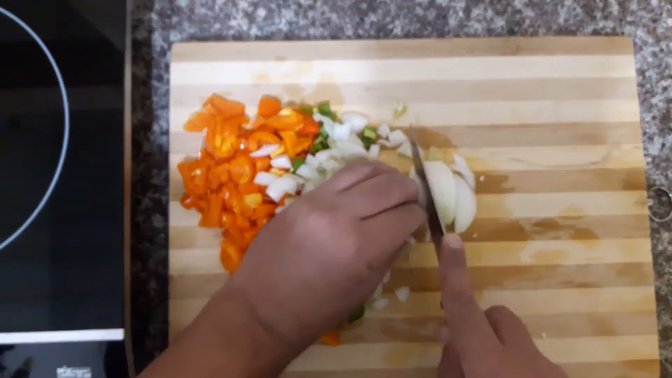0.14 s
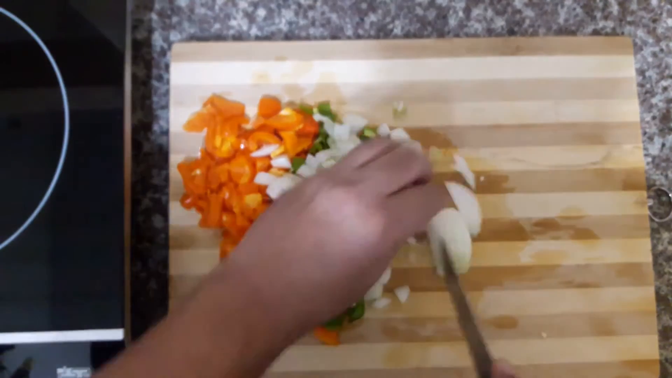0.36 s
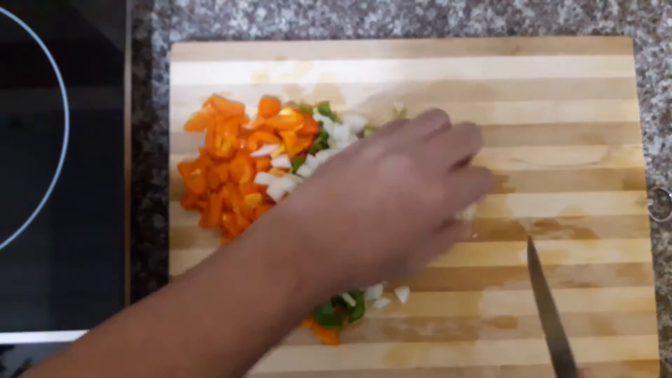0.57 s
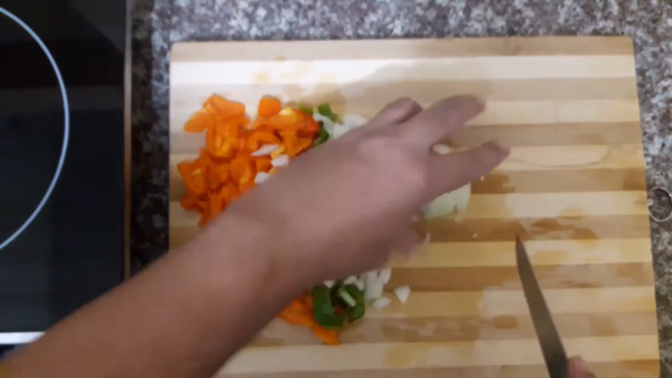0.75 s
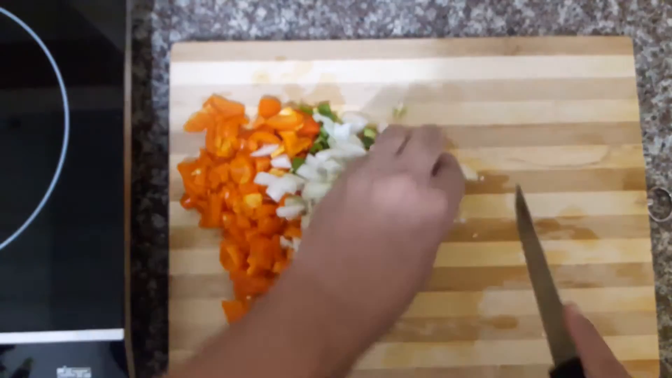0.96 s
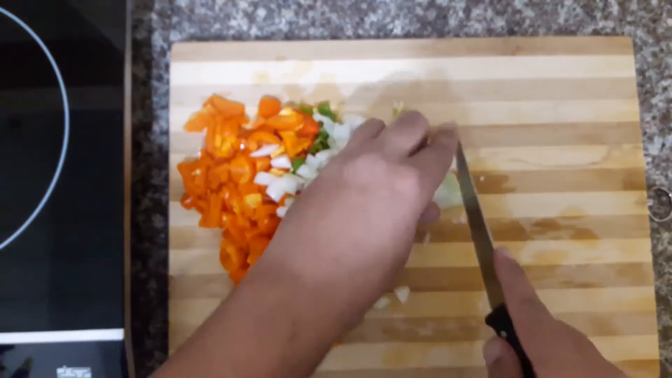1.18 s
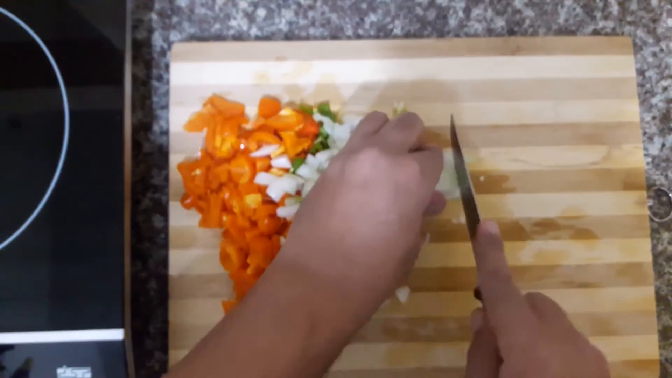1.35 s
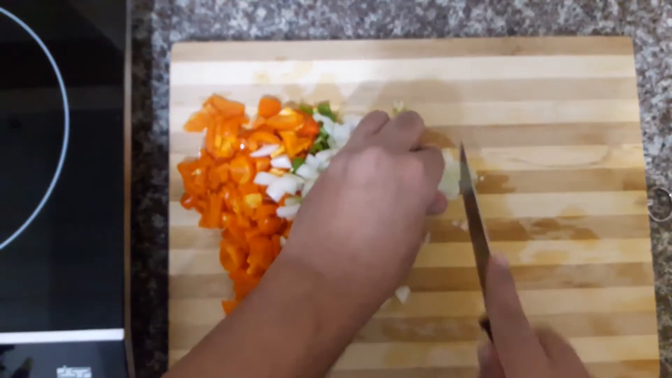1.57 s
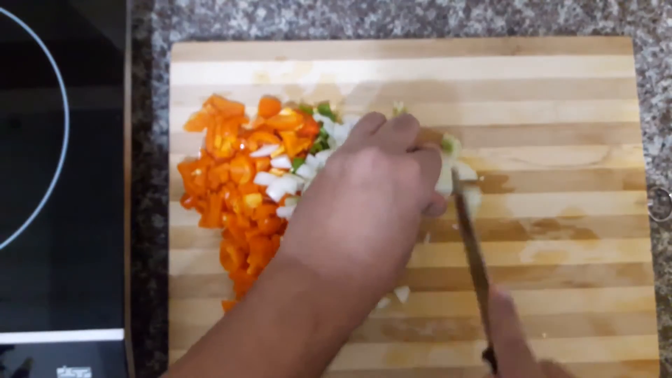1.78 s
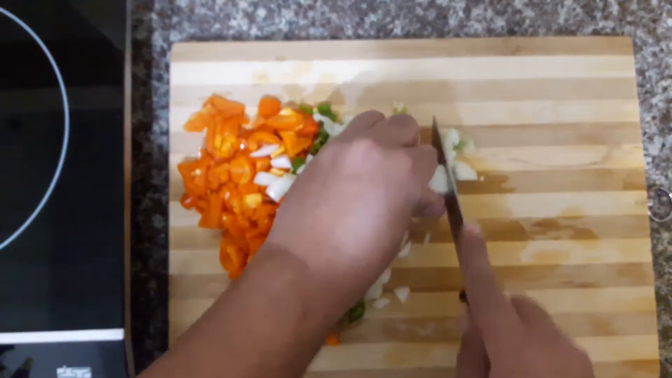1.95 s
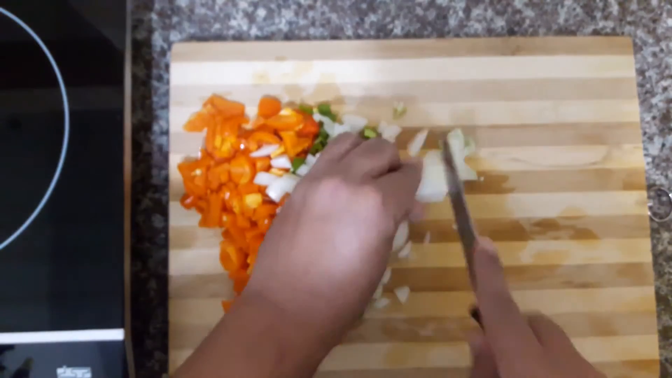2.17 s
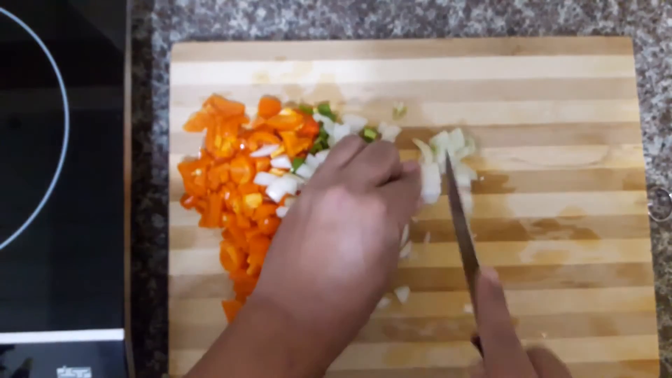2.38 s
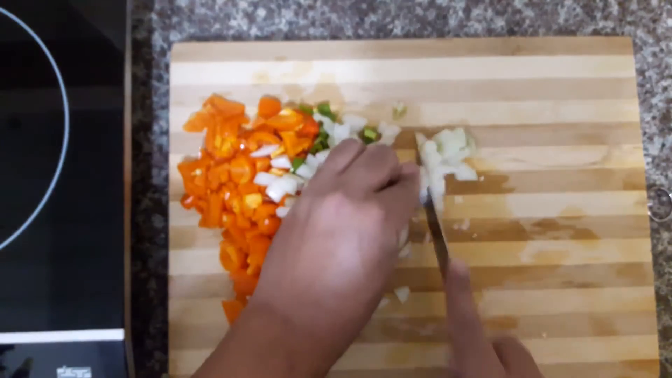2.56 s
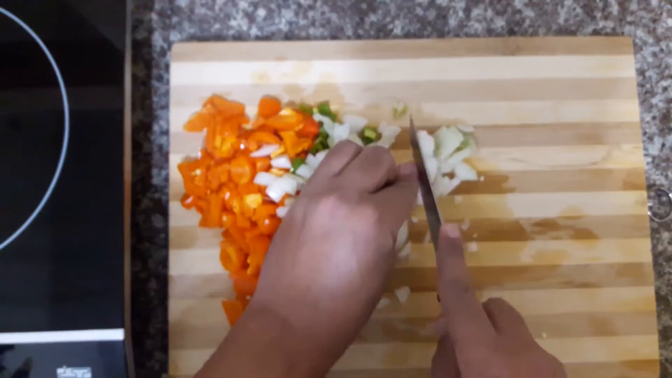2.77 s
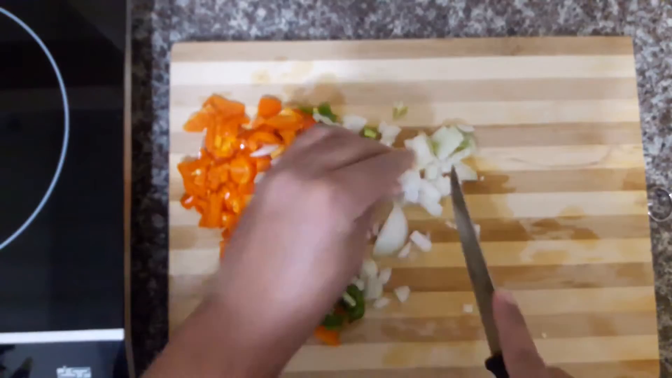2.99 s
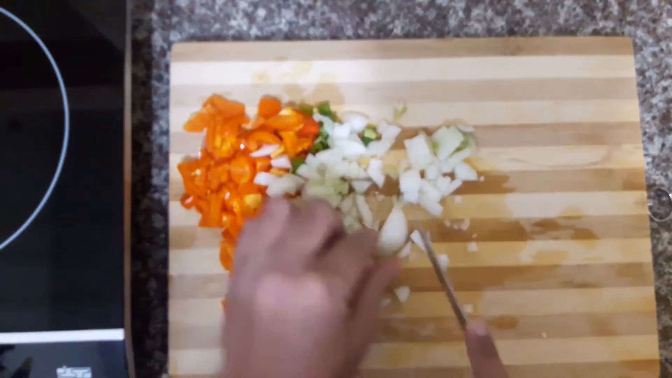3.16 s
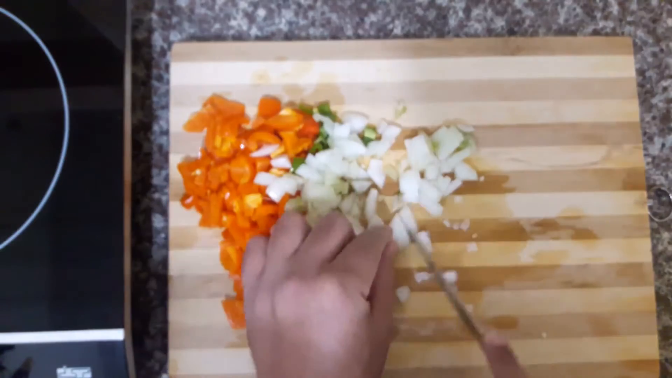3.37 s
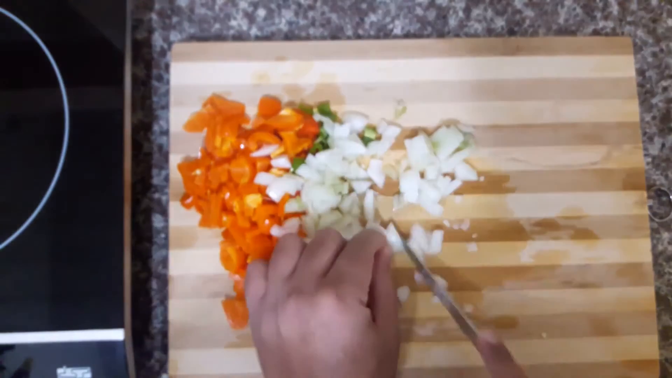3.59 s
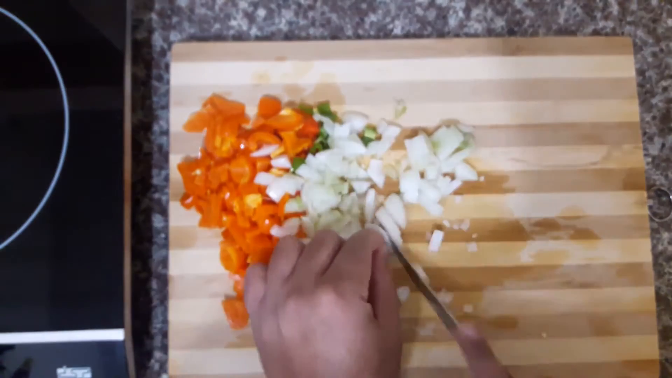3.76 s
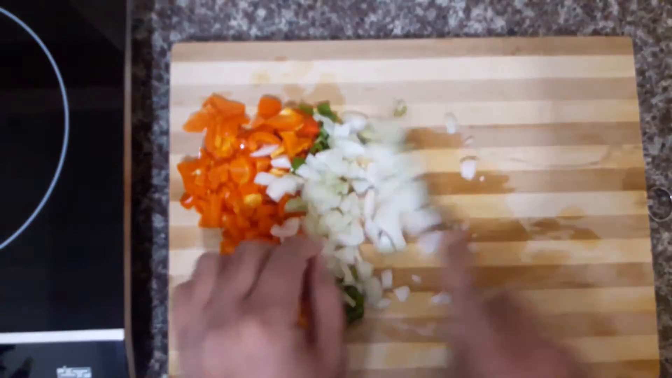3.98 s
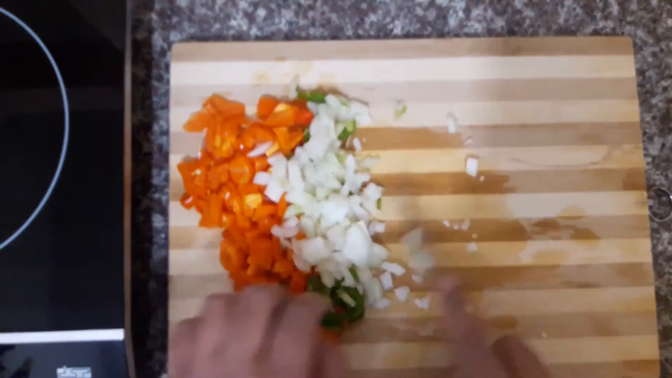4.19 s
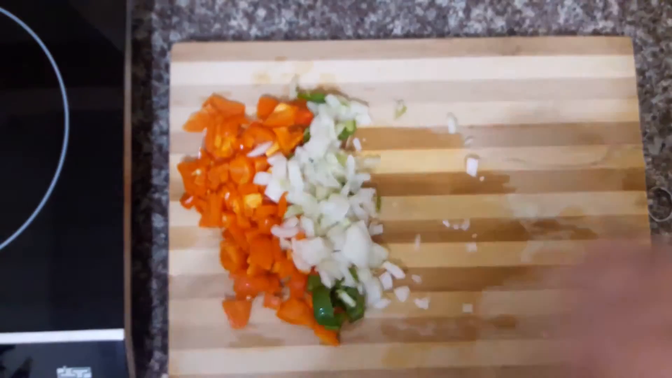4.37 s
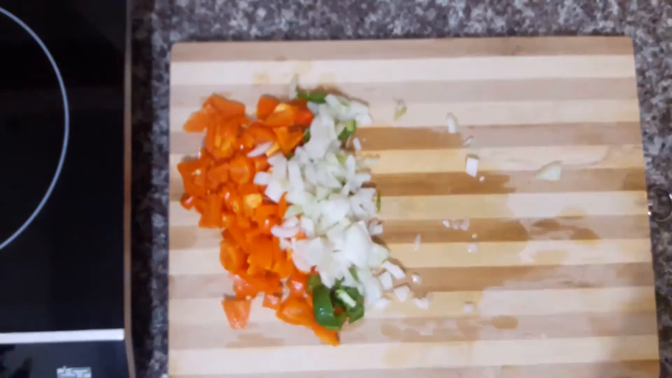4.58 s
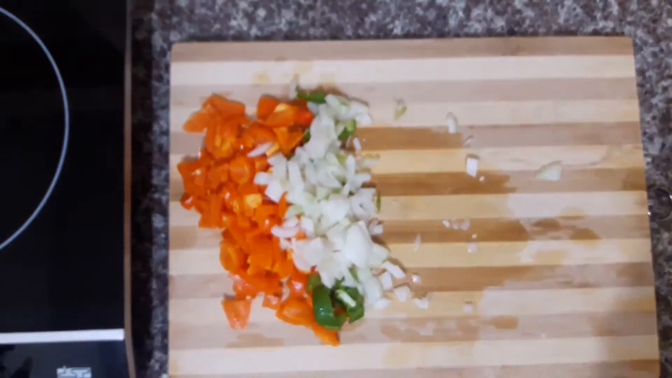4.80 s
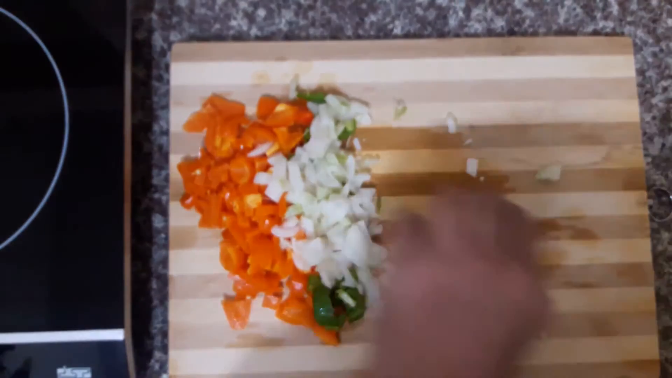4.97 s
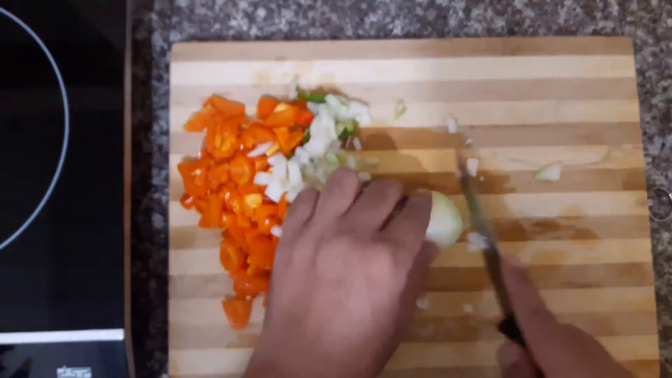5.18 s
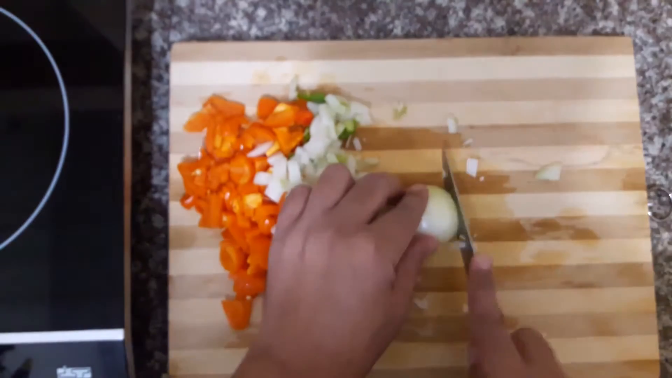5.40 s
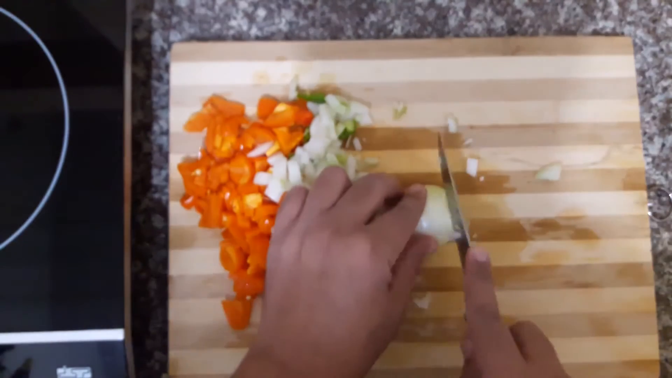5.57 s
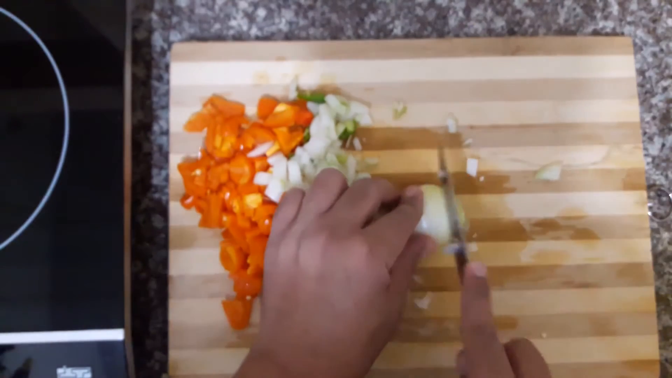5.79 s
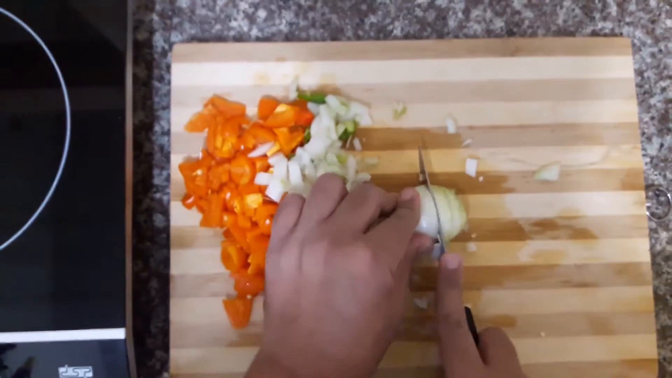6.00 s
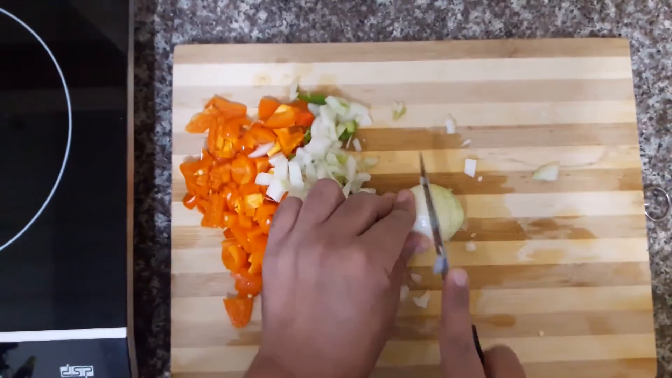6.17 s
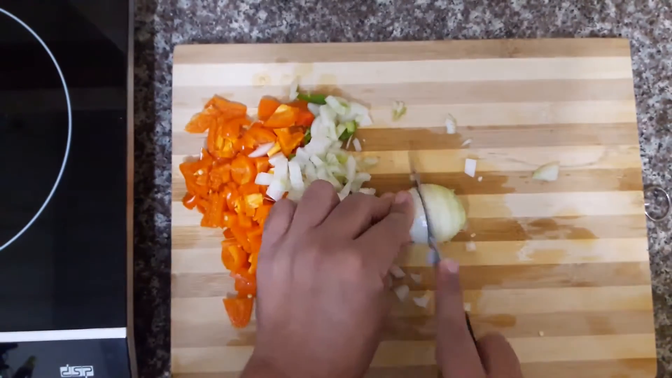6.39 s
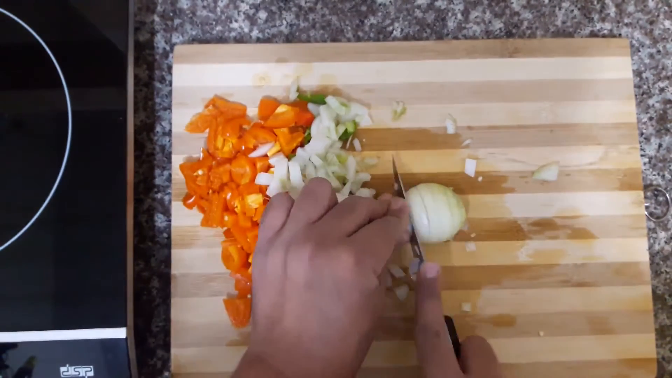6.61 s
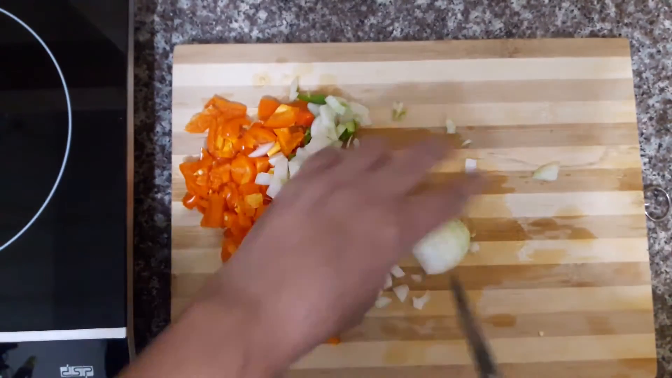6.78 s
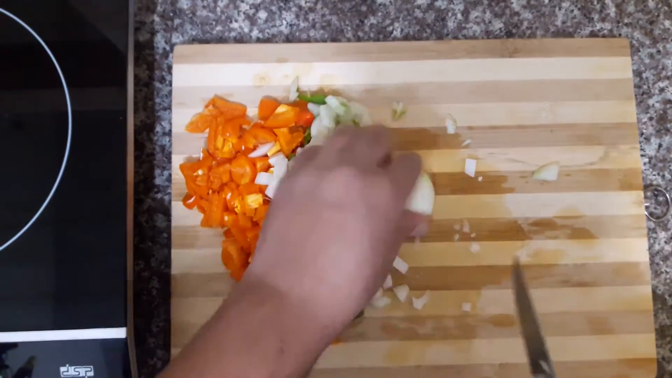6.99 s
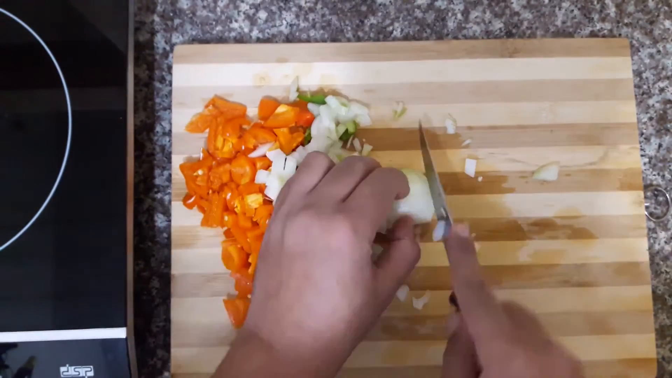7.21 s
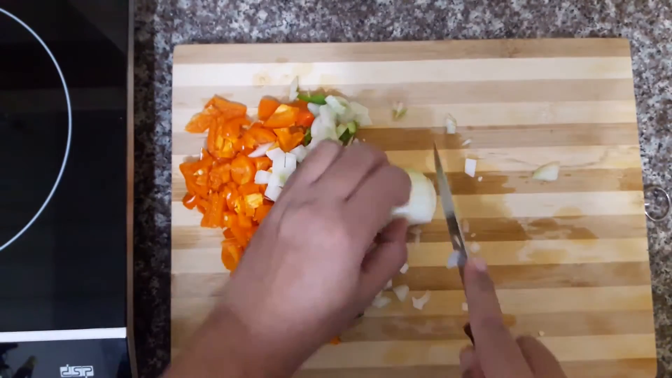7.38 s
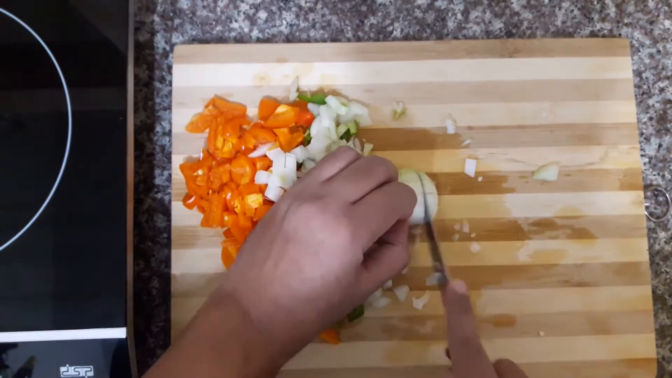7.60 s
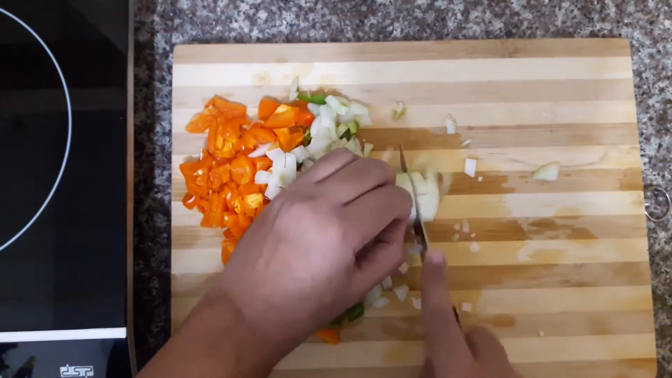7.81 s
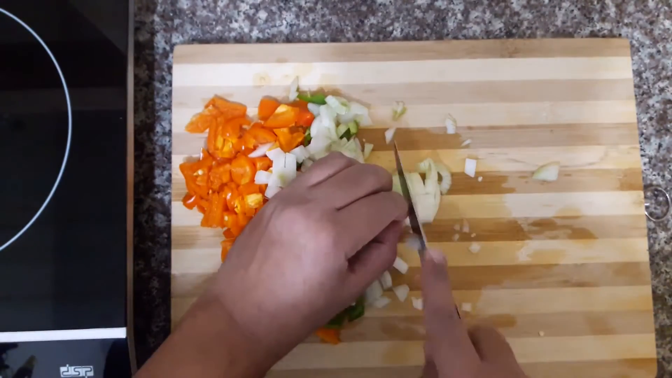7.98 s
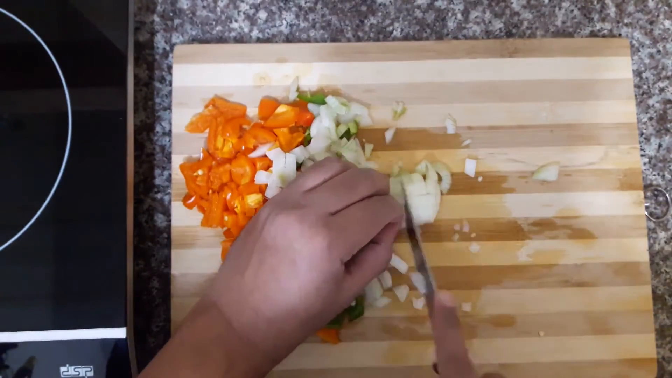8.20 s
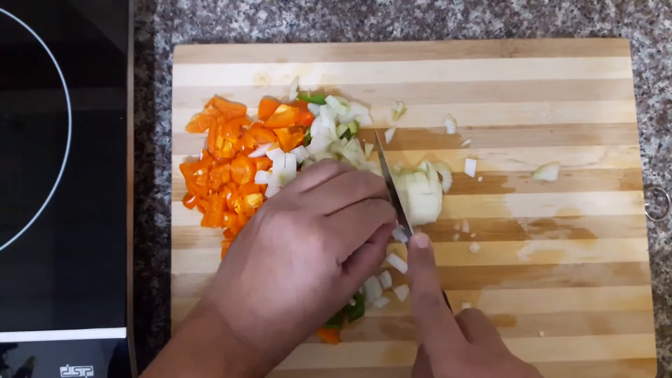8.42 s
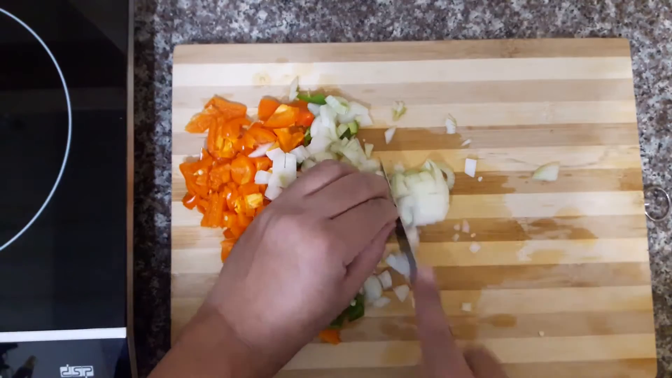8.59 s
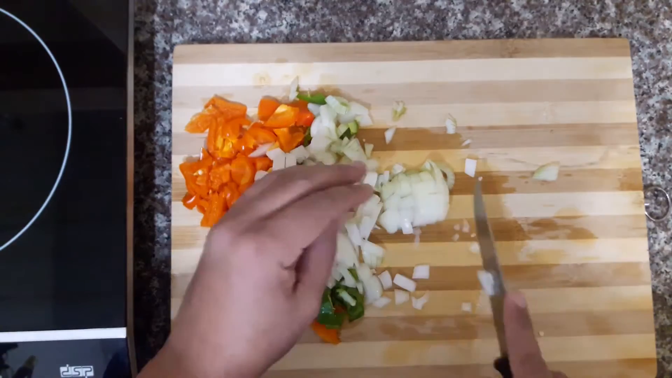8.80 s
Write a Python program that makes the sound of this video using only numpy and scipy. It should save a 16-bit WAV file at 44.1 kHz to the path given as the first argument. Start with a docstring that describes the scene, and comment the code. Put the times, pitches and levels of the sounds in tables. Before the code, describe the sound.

Quiet room air and the faint ring of an earlier chop open the scene, heard close in a small reflective kitchen. A hand rustles, onion crunches and the knife knocks the wooden board at 0.24 s. Soft handling fills the gap until 1.4 s, then crisp cuts land at about 1.5, 1.7, 2.0, 2.3 and 2.9 s, each a crackling wet crunch followed by a hard knock, faint blade ring and low board thud. Three sharper chops come at 3.4, 3.6 and 3.8 s. From 4.0 s pieces are swept aside with rustling, a knock at 4.26 s and tiny wet squeaks near 4.65-4.75 s. Chopping resumes at 5.4, 5.7, 6.1, 6.35 and 6.6 s. After a short, lightly rustling gap, strong regular strokes fall at 7.3, 7.6, 7.9, 8.15 and 8.5 s, the last echo fading into quiet air.

```python
"""First come steady room air and the faint ring of an earlier chop; then a hand rustles and a knife chops onion.
The onion crunches as swarms of snaps, and short impulses excite the wood, the blade edge and a fine fizz.
Low damped modes make the board thud on the counter; wet squeaks are gliding stick-slip tones.
Decaying echoes and lasting tones form the small tiled kitchen, heard close under a phone microphone."""
import sys
import numpy as np
from scipy import signal
from scipy.fft import rfft, irfft, next_fast_len
from scipy.io import wavfile
from scipy.ndimage import uniform_filter1d

SR = 44100
rng = np.random.default_rng(int(sys.argv[2]) if len(sys.argv) > 2 else 0)


def unload_wav(signal):
    """Save mono or channel-first audio to the path in sys.argv[1] as 16-bit WAV at rate SR, clipped to [-1, 1]."""
    wavfile.write(
        sys.argv[1],
        SR,
        np.round(np.clip(np.atleast_2d(signal).T, -1, 1) * 32767).astype(np.int16),
    )


N = 390285  # length [samples]

# room air and hiss: (frequency [Hz], relative density [dB per Hz])
AIR_COLOUR = [(24, -30.5), (40, -2.5), (49, -12.5), (64, -12.5), (220, -1.5), (433, -2), (529, -0.5),
              (1480, -10), (1760, -11), (7000, -24), (13800, -28.5), (16000, -54)]
AIR_DB = -69  # middle level of the slow swell
WIDE_DB = -9.5  # side air relative to the air common to both channels

# band decay of the kitchen: (frequency [Hz], decay by 60 dB [s])
KITCHEN_T60 = [(100, 0.21), (260, 0.91), (700, 0.28), (1840, 0.38), (4850, 0.33), (12800, 0.25)]
# colour of the kitchen: (frequency [Hz], gain [dB])
KITCHEN_COLOUR = [(200, -7), (450, 2.5), (700, 13), (1200, 3.5), (2000, -4.5), (3000, 2.5), (4500, 2.5),
                  (7000, 7), (10000, 7.5), (15000, 6)]
# lasting tones of cupboards and counter: (frequency [Hz], relative level [dB])
LASTING_TONES = [(589, 7.5), (715, -4.5), (951, -11.5), (1216, -15), (1309, -6.5), (1553, -22.5),
                 (1743, 6.5), (1783, -4.5), (1955, 1), (2112, 9), (2300, 7), (4041, -13)]
TONES_T60 = 0.28  # s
PATCHY_DB = 2.5  # rms unevenness: walls and shelves make echoes lumpy in time and pitch
EARLIER_DB = -32  # wood force of a chop just before the start, heard only through the room

# hand and blade among the pieces:
# (loudest time [s], level [dB], treble lift [dB], rise [s], fall [s])
RUSTLES = [(.135, -57.5, 2, 0.072, .02), (.65, -72, 3.5, .1, 0.076), (.87, -64, -18, .05, 0.54),
           (.99, -63.5, 4, 0.17, .12), (1.13, -75, -5, 0.0091, .03), (1.25, -66, -20.5, .2, .2),
           (1.395, -58.5, -6, 0.12, .02), (3.227, -66, 3, 0.011, 0.036), (3.301, -61, -3, 0.086, 0.021),
           (4.008, -45, 0, 0.0034, 0.12), (4.2, -68, -4, 0.065, .05), (4.33, -50, -6.5, 0.047, 0.37),
           (4.63, -62.5, 10.5, 0.018, .06), (4.685, -56, -9, 0.013, 0.11), (4.96, -59.5, -1, 0.22, .25),
           (5.335, -69.5, 4.5, .008, 0.017), (6.919, -62, -3.5, 0.068, .08),
           (6.995, -67.5, 2.5, 0.018, 0.076), (7.25, -69.5, -2, 0.011, 0.031)]
# rustling grains: (frequency [Hz], relative density [dB per Hz])
RUSTLE_COLOUR = [(88, -42), (150, -18.5), (249, -15), (275, -17.5), (514, -5), (601, -9), (730, -2.5),
                 (805, -10.5), (1400, -13.5), (2050, -9), (2800, -12.5), (7620, -28), (14200, -30.5),
                 (16000, -34)]
RUSTLE_SPAN_DB = 20  # change of level over one rise or fall
TREBLE_HZ = 1600  # where the lifted treble begins

# blade splits onion, pieces shift: (time [s], level [dB], crispness [dB], length [s])
CRUNCHES = [(0.087, -42.5, 1, 0.006), (0.134, -36.5, -12.5, 0.0088), (0.142, -24.5, -0.5, 0.015),
            (0.173, -20.5, 1, 0.011), (0.235, -16, 1.5, 0.0031), (1.126, -44.5, -31, 0.0055),
            (1.331, -54, 9, 0.005), (1.383, -46.5, 4.5, 0.01), (1.399, -34.5, 0, 0.012),
            (1.444, -18.5, -4, 0.0039), (1.453, -17, 2.5, 0.0035), (1.459, -10, 2.5, 0.0035),
            (1.466, -14, -2, 0.0074), (1.674, -27, 2, 0.033), (1.725, -18.5, 4.5, 0.0094),
            (1.937, -29, -2.5, 0.019), (1.951, -32.5, 3, 0.0054), (1.962, -24, 0.5, 0.0035),
            (1.968, -34, -4, 0.0041), (2.005, -16.5, 5.5, 0.0066), (2.228, -34, 1.5, 0.027),
            (2.267, -32.5, 3.5, 0.0035), (2.301, -24.5, -1, 0.0046), (2.306, -8.5, -0.5, 0.0096),
            (2.502, -26.5, -0.5, 0.038), (2.537, -22, 1, 0.012), (2.569, -14.5, 2, 0.007),
            (2.587, -21.5, -2.5, 0.0054), (2.783, -26.5, -1, 0.038), (2.847, -11, 2.5, 0.033),
            (3.304, -37, -7.5, 0.01), (3.343, -18, -1.5, 0.013), (3.358, -25, 3, 0.004),
            (3.549, -15.5, -2, 0.005), (3.565, -18.5, 0, 0.003), (3.735, -30, -1, 0.008),
            (3.746, -19, 1, 0.01), (3.772, -14.5, -39.5, 0.0011), (4.002, -26, 0.5, 0.025),
            (4.397, -35.5, -2.5, 0.0082), (4.619, -52, 3.5, 0.0049), (4.643, -40.5, -4, 0.01),
            (4.693, -27, -22, 0.0044), (4.742, -40.5, -8, 0.005), (5.082, -56, 0, 0.0054),
            (5.382, -28, 0.5, 0.0058), (5.421, -22, 2.5, 0.0024), (5.62, -38, 5.5, 0.0057),
            (5.636, -16, -2, 0.0051), (5.695, -5, -0.5, 0.024), (5.884, -26, 0.5, 0.0045),
            (5.908, -17.5, 4, 0.0017), (5.917, -18, -3, 0.0033), (5.927, -22, -0.5, 0.004),
            (5.94, -33.5, 2.5, 0.0036), (6.051, -39, 7, 0.0042), (6.28, -29.5, 1.5, 0.018),
            (6.304, -20, 2, 0.018), (6.325, -15, -3, 0.011), (6.545, -33.5, -3.5, 0.023),
            (6.572, -23, -2, 0.013), (6.591, -19.5, 2.5, 0.032), (7.243, -43.5, -23, 0.0067),
            (7.289, -19, 2, 0.036), (7.517, -34.5, -1, 0.012), (7.554, -34, -1, 0.008),
            (7.572, -18, -2, 0.0026), (7.58, -14.5, -1.5, 0.0033), (7.587, -8.5, -1.5, 0.008),
            (7.805, -39, -1, 0.003), (7.813, -27, -1.5, 0.0039), (7.857, -23, -1.5, 0.0024),
            (7.862, -9, 2, 0.0078), (8.059, -33.5, 2, 0.0098), (8.084, -27, 2.5, 0.0081),
            (8.106, -24.5, 3, 0.002), (8.114, -21, -17, 0.0051), (8.136, -22, 0, 0.0061),
            (8.143, -14, -1, 0.0044), (8.413, -33, 3.5, 0.012), (8.47, -41.5, 8, 0.0033),
            (8.509, -27, 5, 0.0086), (8.53, -15, 1.5, 0.00087)]
CRUNCH_EDGE_DB, CRUNCH_FIZZ_DB = -10, -5.5  # relative to crunch level at zero crispness
EDGE_PER_CRISP, FIZZ_PER_CRISP = 0.6, 2  # dB gained per dB of crispness

# blade or hand bears down and the board rocks: (time [s], peak level [dB])
PRESSES = [(0.162, -49), (0.189, -44), (1.41, -58), (1.461, -32.5), (1.694, -50), (1.922, -51.5),
           (1.973, -42), (2.01, -36), (2.232, -45), (2.5, -44.5), (2.562, -34), (2.802, -48), (2.85, -41),
           (3.307, -41), (3.351, -47), (3.55, -33.5), (3.754, -42.5), (4.007, -49.5), (4.077, -47.5),
           (4.647, -50), (4.674, -51), (4.741, -52.5), (5.086, -56), (5.386, -36), (5.603, -42),
           (5.641, -40.5), (5.874, -45.5), (5.91, -35.5), (6.274, -46), (6.325, -43.5), (6.525, -54.5),
           (6.595, -41.5), (7.244, -53), (7.523, -39), (7.586, -35.5), (7.783, -45.5), (8.045, -45.5),
           (8.11, -41), (8.425, -52), (8.511, -56)]
# low modes of board and counter before each push varies them:
# (frequency [Hz], level [dB], decay by 60 dB [s])
THUD_MODES = [(212, -10, 0.018), (220, -0.5, 0.37), (245.3, 4.5, 0.12), (295.7, -6.5, 0.28),
              (382.4, -5, 0.21), (500, -22, 0.22)]
REBOUND_S, REBOUND_DB = 0.11, -18.5  # delay and relative level as the board settles back
PUSH_S = 0.0016  # length of a push on the board
THUD_DAMPING = 0.28  # largest log shortening of a ring, drawn at random
THUD_DETUNE = 0.022  # standard deviation of the random pitch shift from thud to thud, share

# blade meets wood: (time [s], peak force [dB], edge ring re peak [dB], fizz re peak [dB],
# room share re peak [dB], board thud [dB])
BLOWS = [(0.2423, -3.5, -13, -25.5, -8.5, -43.5), (1.4726, -6.5, -9.5, -32, -5.5, -36.5),
         (1.7396, -5.5, -7.5, -17, -8, -37), (2.023, -5, -9.5, -36, -8, -42),
         (2.3167, -4, -17, -16, -10, -41.5), (2.8628, -4, -9.5, -62, -3.5, -41),
         (3.373, -5, -24, -33.5, -6.5, -38.5), (3.5836, -2.5, -16.5, -29.5, -7, -39),
         (3.775, -1.5, -16.5, -23, -7.5, -36), (4.2565, -7, -20, -35, -7.5, -45),
         (5.4261, -4.5, -11, -17.5, -4.5, -34), (5.7021, -3, -8.5, -34, -2.5, -34),
         (6.0771, -3.5, -7.5, -24, -5.5, -39), (6.345, -5, -13, -17, -9.5, -54.5),
         (6.6281, -2, -9.5, -28, -7.5, -40.5), (7.307, -6.5, -11, -16.5, -0.5, -37.5),
         (7.599, -0.5, -11, -24.5, -5.5, -31.5), (7.8744, -2, -9.5, -47.5, -6.5, -37.5),
         (8.1521, -3.5, -8, -19.5, -6, -46), (8.534, -4, -5.5, -22, -5, -42)]
# wood knock: (frequency [Hz], relative level [dB])
KNOCK = [(350, -29.5), (520, -20), (700, -15.5), (1000, -11.5), (1300, -1.5), (1600, -2), (1800, 7),
         (2200, 2.5), (2500, -4), (2900, -12), (3800, -22), (6000, -56.5), (14000, -71.5)]
# blade edge: (frequency [Hz], relative level [dB])
EDGE = [(2400, -30.5), (3200, -1.5), (4200, 1.5), (5300, 0), (6300, -12), (8000, -7), (9500, -13.5),
        (11500, -28.5), (16000, -49)]
# finest snaps: (frequency [Hz], relative level [dB])
FIZZ = [(7000, -7), (9500, -3.5), (11500, -4.5), (13500, 0.5), (14800, -6), (15500, -13.5), (16100, -35.5)]
# a thud of BUMP_AT_DB brings a low bump of BUMP_DB; slope in dB per dB
BUMP_DB, BUMP_AT_DB, BUMP_SLOPE = -59, -46, 1.9

# wet skin slipping on something smooth: (time [s], length [s], start [Hz], end [Hz],
# slip tone 1 [dB], slip tone 2 [dB], slip tone 3 [dB])
SQUEAKS = [(3.651, 0.065, 2880, 2880, -53, -91.5, -92), (4.669, 0.029, 3254, 2830, -42.5, -79, -67),
           (4.643, .06, 2290, 2270, -75, -69, -90), (4.739, 0.0244, 1735, 1880, -50, -61, -71),
           (4.957, 0.17, 1318, 1340, -86, -72, -76), (5.126, 0.13, 1780, 1760, -74.5, -89, -93.5)]
FLUTTER_DB = 3.5  # rms level change as a squeak catches and breaks
WAVER = 0.022  # rms pitch unsteadiness, share

CEILING = 0.85  # amplitude that rounded peaks approach
EDGE_HZ = 16400  # upper band limit


def gain_of(db):
    """Amplitude ratio: twenty decibels for each factor of ten."""
    return 10 ** (np.asarray(db) / 20)


def evened(x):
    """Power normalisation: scales to unit rms."""
    return x / np.sqrt(np.mean(x ** 2) + 1e-20)


def read(points, hz):
    """Logarithmic pitch scale: interpolates a spectrum along log frequency."""
    f, value = np.transpose(points)
    return np.interp(np.log(hz + 1), np.log(f + 1), value)


def coloured(x, points):
    """Linear filtering: multiplies the spectrum of a sound by a gain curve."""
    size = next_fast_len(len(x))
    gain = gain_of(read(points, np.fft.rfftfreq(size, 1 / SR)))
    return irfft(rfft(x, size) * gain, size)[:len(x)]


def add(mix, s, sound):
    """Superposition: adds a sound to the mix at time s."""
    part = mix[..., max(round(s * SR), 0):][..., :sound.shape[-1]]
    part += sound[..., :part.shape[-1]]


def ring(modes, seconds):
    """Modal decay: sums damped sines, each swelling over about one cycle."""
    t = np.arange(round(seconds * SR)) / SR
    out = np.zeros(len(t))
    for hz, db, t60 in modes:
        decay = gain_of(db - 60 * t / t60)
        onset = 1 - np.exp(-1.5 * hz * t)
        out += decay * np.sin(2 * np.pi * hz * t) * onset
    return out


def click(points):
    """Minimum phase: the log gain fixes the phase of the shortest causal click."""
    log_gain = read(points, abs(np.fft.fftfreq(2048, 1 / SR))) * np.log(10) / 20
    spectrum = np.exp(np.conj(signal.hilbert(log_gain)))
    return np.fft.ifft(spectrum).real[:512]


def struck(force):
    """Impulse response: forces excite wood, edge and fizz, too small to radiate bass."""
    sound = np.zeros(N)
    for track, colour in zip(force, (KNOCK, EDGE, FIZZ)):
        body = click(colour)
        sound += signal.oaconvolve(track, body / abs(body).max())[:N]
    return signal.sosfilt(signal.butter(2, 260.0, "high", fs=SR, output="sos"), sound)


def air():
    """Stationary noise: coloured room air and microphone hiss with a slow swell."""
    swell = uniform_filter1d(uniform_filter1d(rng.standard_normal(N), 6000), 6000)
    noise = evened(coloured(rng.standard_normal(N), AIR_COLOUR))
    return gain_of(AIR_DB + 1.3 * evened(swell)) * noise


def tail():
    """Reverberation: sparse echoes decay band by band over a few lasting tones."""
    taps = np.zeros(SR // 2)
    # a short gap, then one echo of random sign in each 12-sample slot
    at = np.arange(90, len(taps) - 12, 12)
    taps[at + rng.integers(0, 12, len(at))] = rng.choice([-1.0, 1.0], len(at))
    hz, t, bands = signal.stft(taps, SR, nperseg=256)
    patches = uniform_filter1d(rng.standard_normal(bands.shape), size=6, axis=0)
    patches = evened(uniform_filter1d(patches, size=3, axis=1))
    decay_db = -60 * t / read(KITCHEN_T60, hz)[:, None]
    bands = bands * gain_of(PATCHY_DB * patches + decay_db)
    echoes = signal.istft(bands, SR, nperseg=256)[1][:len(taps)]
    tones = ring([(f, db, TONES_T60) for f, db in LASTING_TONES], 0.5)
    tones = tones * np.minimum(np.arange(len(taps)) / 67.0, 1)  # soft onset
    both = echoes / np.linalg.norm(echoes) + gain_of(-15.0) * tones / np.linalg.norm(tones)
    return coloured(np.r_[both, np.zeros(500)], KITCHEN_COLOUR)


def kitchen(force, tonal):
    """Diffuse field: force samples scatter among three tails; lasting sounds pass slowly between."""
    turn = np.pi * np.arange(N) / SR * 1.1
    path = rng.integers(0, 3, N)
    out = np.zeros(N)
    for k in range(3):
        share = np.sqrt(2 / 3) * np.cos(turn + k * np.pi / 3)  # the three powers sum to 1
        feed = struck(force * (path == k)) + tonal * share
        out += signal.fftconvolve(feed, tail())[:N]
    return out


def rustle():
    """Granular friction: dense clumped grains swell and fade with each movement of the hand."""
    clumps = evened(uniform_filter1d(rng.standard_normal(N), size=300))
    size_db = 1.9 * rng.exponential(1, N).clip(0, 5) + 2.5 * clumps
    grains = rng.standard_normal(N) * gain_of(size_db)
    grains = evened(coloured(grains, RUSTLE_COLOUR))
    highpass = signal.butter(2, TREBLE_HZ, "high", fs=SR, output="sos")
    treble = signal.sosfiltfilt(highpass, grains)
    t = np.arange(0, N, 32) / SR  # coarse time grid for the slow levels
    level = np.zeros((2, len(t)))
    for s, db, lift_db, rise, fall in RUSTLES:
        swell_db = db - RUSTLE_SPAN_DB * np.maximum((s - t) / rise, (t - s) / fall)
        level += gain_of(swell_db + np.array([[0], [lift_db]]))
    low, high = (np.interp(np.arange(N) / SR, t, row) for row in level)
    return (grains - treble) * low + treble * high


def crunches():
    """Brittle fracture: cell walls burst in short swarms of snaps of very uneven size."""
    force = np.zeros((3, N))
    t = np.arange(1, 2500) / SR
    size = (len(CRUNCHES), len(t))
    snaps = rng.standard_normal(size) * gain_of(3.9 * rng.exponential(1, size).clip(0, 5))
    for (s, db, crisp, length), swarm in zip(CRUNCHES, snaps):
        swell = 1 - np.exp(-t / 0.0013)
        fade = np.exp(-(t / max(length, 1e-3)) ** 2)
        swarm = swarm * swell * fade
        edge_db = CRUNCH_EDGE_DB + EDGE_PER_CRISP * crisp
        fizz_db = CRUNCH_FIZZ_DB + FIZZ_PER_CRISP * crisp
        gains = gain_of(db + np.array([0, edge_db, fizz_db]))
        add(force, s, np.outer(gains, swarm / np.linalg.norm(swarm)))
    return force


def thuds():
    """Modal excitation: each blow, rebound and press mixes the low board modes anew."""
    pushes = [(s, db) for s, *_, db in BLOWS]
    pushes += [(s + REBOUND_S, db + REBOUND_DB) for s, db in pushes]
    pushes += PRESSES
    out = np.zeros(N)
    spots_db = 3.5 * rng.standard_normal((len(pushes), len(THUD_MODES)))
    detune = 1 + THUD_DETUNE * rng.standard_normal(len(pushes))
    damping = np.exp(-THUD_DAMPING * rng.random(spots_db.shape))
    push_shape = np.hanning(round(PUSH_S * SR))
    for (s, db), spot_db, bend, damp in zip(pushes, spots_db, detune, damping):
        modes = [(hz * bend, level + change, t60 * k)
                 for (hz, level, t60), change, k in zip(THUD_MODES, spot_db, damp)]
        sound = np.convolve(ring(modes, 0.3), push_shape)
        add(out, s, gain_of(db) * sound / abs(sound).max())
    # nothing radiates below the lowest mode
    return signal.sosfilt(signal.butter(4, 175.0, "high", fs=SR, output="sos"), out)


def blows():
    """Impact: a sharp push precedes brief edge chatter; returns direct and room forces."""
    near, far = np.zeros((2, 3, N))
    rebound = rng.standard_normal((len(BLOWS), 120)) * np.exp(-np.arange(120) / 73.0)
    for (s, db, edge, fizz, room_db, _), chatter in zip(BLOWS, rebound):
        # rows: wood, edge, fizz; the first sample is the push, the rest chatter
        shape = np.c_[[1, 0.7, 0.3], np.outer([0.05, 0.35, 0.6], chatter)]
        push = gain_of(db + np.array([[0], [edge], [fizz]])) * shape
        add(near, s, push)
        strength = np.linalg.norm(push, axis=1, keepdims=True)
        add(far, s, strength * gain_of(room_db))
    add(far, 0, gain_of(EARLIER_DB + np.array([[0], [-7.5], [-21]])))
    return near, far


def low_bumps():
    """Pressure pulse: each blow adds a short low pulse and a weaker opposite swing, scaled by its thud."""
    out, pulse = np.zeros(N), np.hanning(round(0.0014 * SR))
    for s, *_, thud_db in BLOWS:
        level_db = BUMP_DB + BUMP_SLOPE * (thud_db - BUMP_AT_DB)
        add(out, s, gain_of(level_db) * np.r_[pulse, -0.4 * pulse])
    return out


def squeaks():
    """Stick-slip friction: harmonic slip tones glide, waver and flutter."""
    out = np.zeros(N)
    for s, length, start_hz, end_hz, *tones_db in SQUEAKS:
        count = round(length * SR)
        waver = 1 + WAVER * evened(uniform_filter1d(rng.standard_normal(count), size=90))
        turns = np.cumsum(np.geomspace(start_hz, end_hz, count) * waver) / SR
        tone = sum(gain_of(db) * np.sin(2 * np.pi * k * turns) for k, db in enumerate(tones_db, 1))
        flutter = evened(uniform_filter1d(rng.standard_normal(count), size=200))
        tone = tone * gain_of(FLUTTER_DB * flutter)
        # sqrt(2) turns the rms levels of the table into sine peaks
        add(out, s, np.sqrt(2) * tone * signal.windows.tukey(count, 0.6))
    return out


def scene():
    """Direct and reverberant sound add; only the room air differs between the channels."""
    near, far = blows()
    crunch, squeak, thud = crunches(), squeaks(), thuds()
    room_force = far + gain_of(-3) * crunch
    room_tonal = gain_of(-5.0) * squeak + gain_of(-9.5) * thud
    wet = kitchen(room_force, room_tonal)
    mid = struck(near + crunch) + squeak + thud + wet + low_bumps() + rustle() + air()
    side = gain_of(WIDE_DB) * air()
    return np.array([mid + side, mid - side])


def record(dry):
    """Saturation rounds the sharpest peaks; a band limit and a small offset follow."""
    rounded = dry / (1 + (dry / CEILING) ** 4) ** (1 / 4)
    lowpass = signal.firwin(511, EDGE_HZ, window=("kaiser", 9), fs=SR)
    return signal.oaconvolve(rounded, lowpass[None], "same") - 0.0005


dry = scene()
out = record(dry)
unload_wav(out)
```